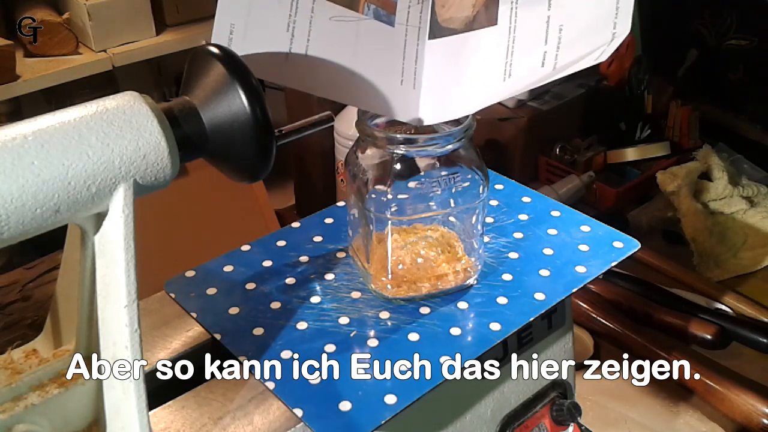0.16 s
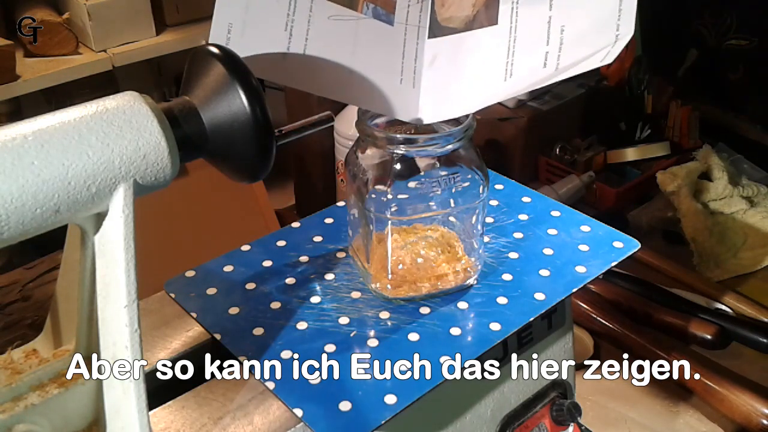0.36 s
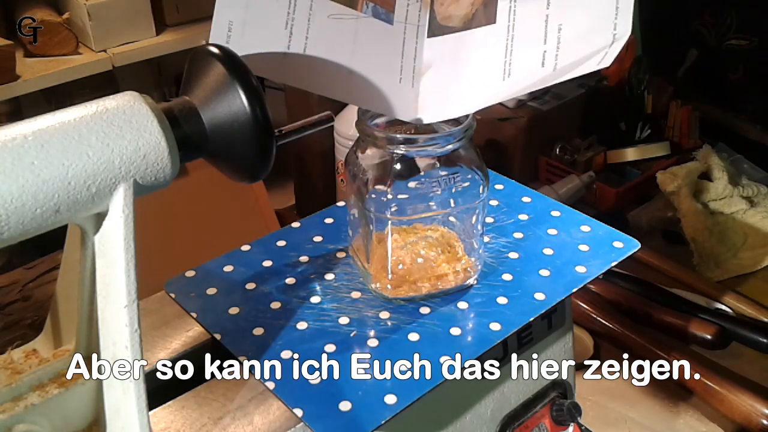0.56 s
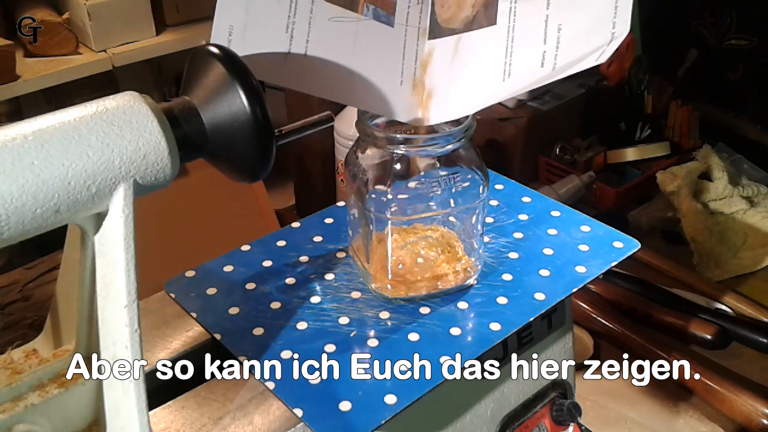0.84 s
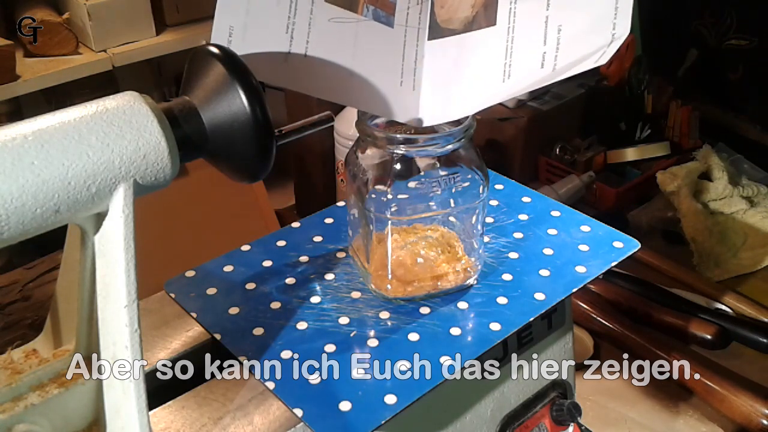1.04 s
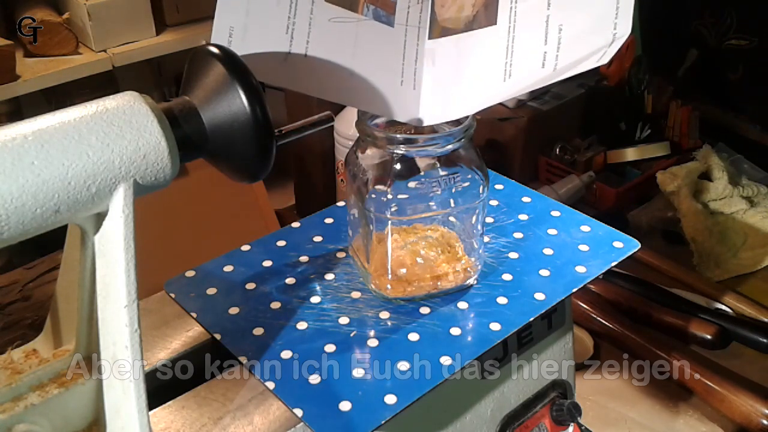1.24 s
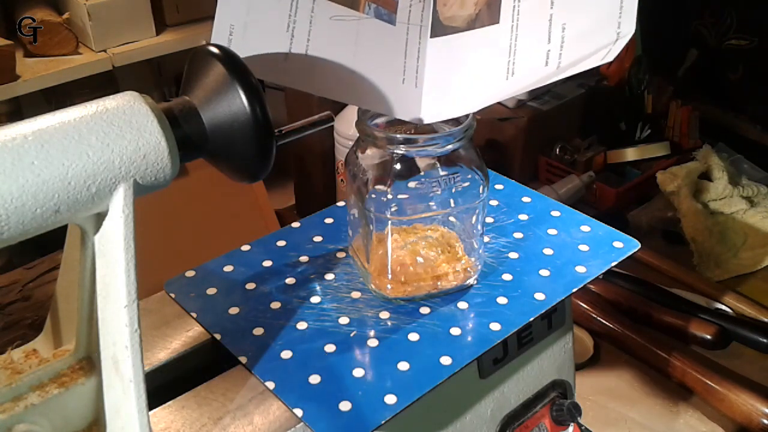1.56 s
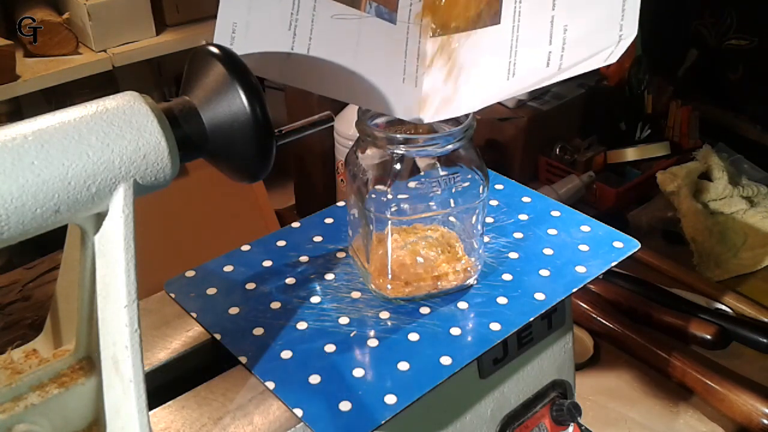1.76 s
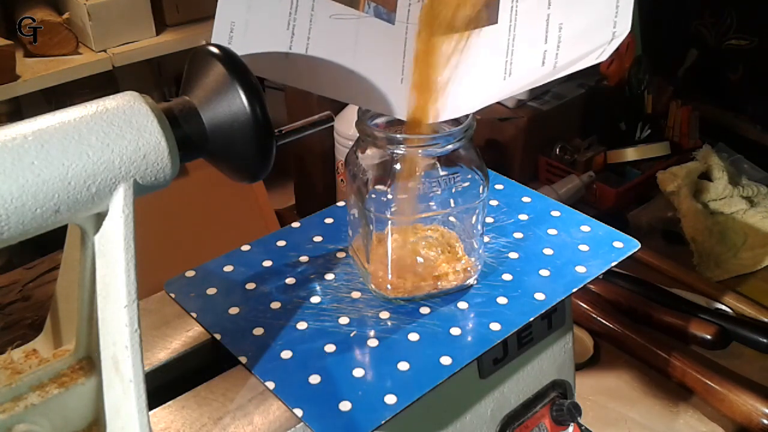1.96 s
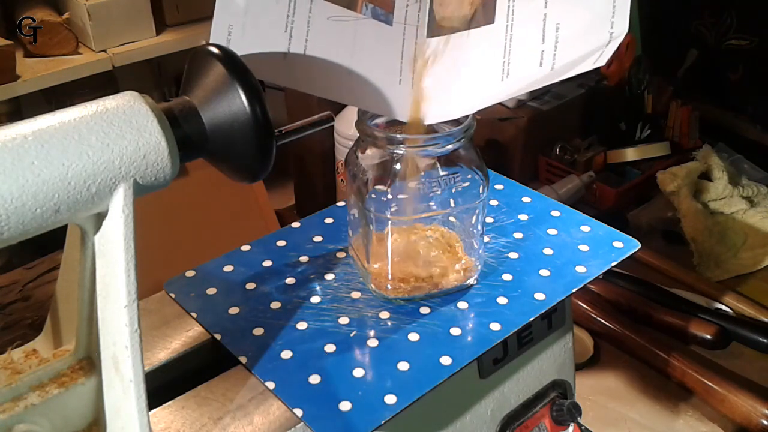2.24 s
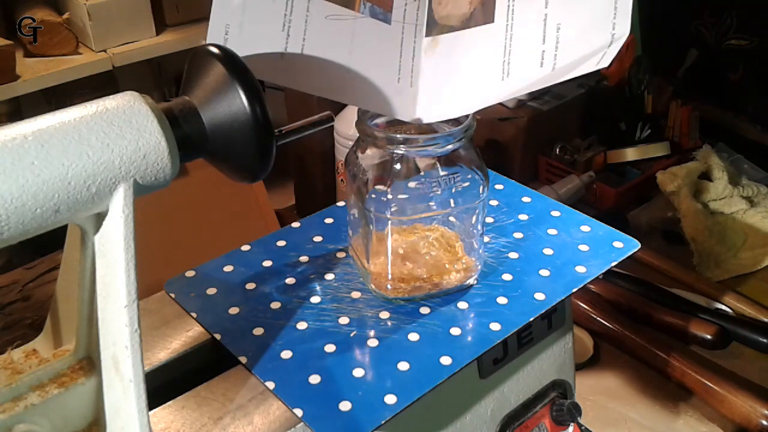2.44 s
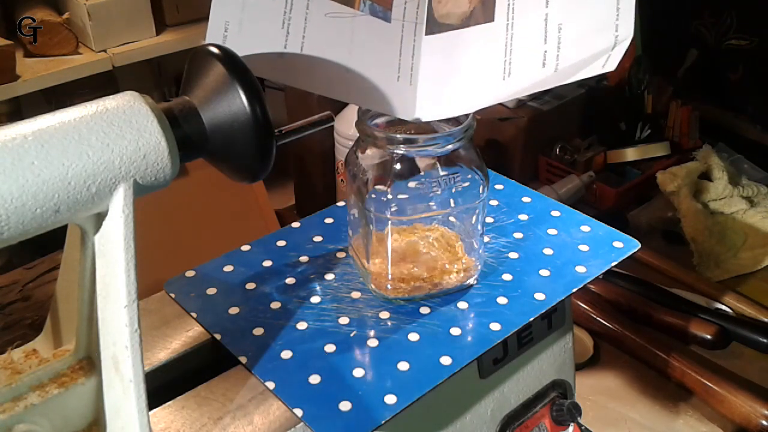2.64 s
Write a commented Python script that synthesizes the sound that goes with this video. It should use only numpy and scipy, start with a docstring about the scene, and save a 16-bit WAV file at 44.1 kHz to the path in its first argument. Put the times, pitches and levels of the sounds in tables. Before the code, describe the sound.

Crisp dry flakes tick and rattle into a glass jar, swelling twice into a grainy hiss

```python
"""In a quiet workshop, dry brittle flakes slide off a folded sheet of paper and drop into a glass jar.
Single flakes tick and bounce: each is a few clicks that ring briefly, with a short rattle of noise.
The stream swells twice into a dense hiss, made of thousands of random clicks and smooth sliding noise.
Resonances of the air in the jar colour it, and a few flakes ring the glass wall.
A short room tail, a slowly growing background hiss and a low rumble lie around it."""
import sys
import numpy as np
from scipy import signal
from scipy.fft import rfft, irfft
from scipy.io import wavfile

SR = 44100
rng = np.random.default_rng(int(sys.argv[2]) if len(sys.argv) > 2 else 0)


def master(y):
    """Save y as 16-bit WAV."""
    cut = np.clip(np.atleast_2d(y).T, -1, 1)
    pcm = np.round(cut * 32767)  # scale
    wavfile.write(sys.argv[1], SR, pcm.astype(np.int16))


N = 123479  # length in samples


def from_db(db):
    """Turn decibels into a gain."""
    return 10 ** (np.asarray(db) / 20)


def rms_one(x):
    """Scale a signal so that its rms is 1."""
    return x / np.sqrt(np.mean(x ** 2) + 1e-20)


def in_time(rows):
    """Join (time, value) points by straight lines, with one value for every sample."""
    return np.interp(np.arange(N) / SR, *np.transpose(rows))


def coloured(x, spectrum):
    """Filter with the shape of a spectrum, without ringing ahead; white noise keeps its power."""
    size = 4096
    hz, db = np.transpose(spectrum)
    grid_hz = np.maximum(np.arange(size // 2 + 1) * SR / size, 1)
    log_gain = np.interp(np.log(grid_hz), np.log(hz), db) * np.log(10) / 20
    # folding the cepstrum to positive times gives the minimum-phase pulse
    cepstrum = irfft(log_gain)
    cepstrum[1:size // 2] *= 2
    cepstrum[size // 2 + 1:] = 0
    pulse = irfft(np.exp(rfft(cepstrum)))
    return signal.fftconvolve(x, pulse / np.sqrt(np.sum(pulse ** 2)))[:N]


def drift(rate_hz):
    """Slow random wandering with rms 1: noise smoothed above the given rate."""
    r = np.exp(-2 * np.pi * rate_hz / SR)
    noise = rng.standard_normal(N + SR)
    settled = signal.lfilter([1], [1, -2 * r, r * r], noise)[SR:]
    return rms_one(settled)


def ring(clicks, hz, t60_s):
    """A unit click starts a sine of height 1 that fades by 60 dB in t60_s."""
    r = from_db(-60 / (t60_s * SR))
    w = 2 * np.pi * hz / SR
    return signal.lfilter([0, np.sin(w)], [1, -2 * r * np.cos(w), r * r], clicks + 1e-18)


def flake_sound(clicks, hz):
    """A flake cracks and rings for a few cycles at its own pitch, the ring scaled to the click's energy."""
    cycles, crack_share = 3.5, .5  # cycles until the ring is 60 dB down
    t60_s = cycles / hz
    one_ring = ring(np.arange(2000) == 0, hz, t60_s)
    rung = ring(clicks, hz, t60_s) / np.sqrt(np.sum(one_ring ** 2))
    return crack_share * clicks + np.sqrt(1 - crack_share ** 2) * rung


def dull(x):
    """Rubbing contacts are softer than hits, so their treble is weaker."""
    return signal.lfilter(*signal.butter(1, 2700, fs=SR), x)


def stream():
    """Flakes land at random, denser and stronger with the flow; returns their sound and the wall strikes."""
    # strength of the stream before jar and colour: start_s, level_db
    flow = [(0, -72), (.3, -65.5), (.49, -53), (.55, -42.5), (.6, -51), (.63, -37.5), (.68, -37),
            (.75, -30.5), (.92, -30), (.97, -34), (1.0, -36), (1.08, -36), (1.135, -49), (1.15, -35.5),
            (1.2, -45.5), (1.278, -55), (1.284, -37.5), (1.44, -37), (1.53, -43.5), (1.548, -43),
            (1.575, -50.5), (1.615, -49.5), (1.632, -44), (1.674, -43), (1.688, -32.5), (1.735, -31.5),
            (1.8, -23), (2.1, -22.5), (2.2, -25.5), (2.38, -30.5), (2.47, -34), (2.56, -38), (2.62, -42.5),
            (2.65, -51), (2.69, -59), (2.78, -66), (2.8, -44)]
    full_flow_db = -22
    flow_db = in_time(flow)
    below_full_db = flow_db - full_flow_db

    flakes_per_s, density_follows = 8000, .7  # landings at full flow; share of the dB swing that thins them
    chance = flakes_per_s * from_db(density_follows * below_full_db) / SR  # per sample

    # clumps: the level wanders, less in a denser stream
    clump_db, clump_most_db, clump_evens, clump_rate_hz = .68, 3, .57, 38
    clump_swing_db = np.minimum(clump_db * from_db(-clump_evens * below_full_db), clump_most_db)
    level_db = flow_db + clump_swing_db * drift(clump_rate_hz)

    size_db = 1 * np.minimum(rng.exponential(1, N), 3)
    sizes = rms_one(from_db(size_db) * rng.choice([-1, 1], N))
    # dividing by the root of the chance keeps the power tied to the flow alone
    clicks = (rng.random(N) < chance) * sizes / np.sqrt(chance) * from_db(level_db)

    # every flake is dealt one of 16 pitches
    pitches_hz = np.geomspace(677, 9740, num=16)
    dealt = rng.integers(0, 16, N)
    bed = sum(flake_sound(clicks * (dealt == k), hz) for k, hz in enumerate(pitches_hz))

    # fine dust and sliding: a smooth hiss that follows the flow
    slide_db, slide_follows = -1, .84  # against full flow; share of the dB swing
    slide_gain = from_db(full_flow_db + slide_db + slide_follows * below_full_db)
    bed = bed + slide_gain * dull(rng.standard_normal(N))

    # a full stream sounds thinner in the bass
    bass_hz, bass_loss_db, bass_follows = 1050, 12, 1
    bass = signal.lfilter(*signal.butter(1, bass_hz, fs=SR), bed)
    loss_db = bass_loss_db * from_db(bass_follows * below_full_db)
    bed = bed - bass * (1 - from_db(-loss_db))

    wall_share = .01  # of the stream's flakes
    return bed, clicks * (rng.random(N) < wall_share)


def landings():
    """Each single flake touches, slaps, bounces twice and stirs a short rattle among its neighbours."""
    # flakes that stand out: start_s, level_db (before jar and colour), pitch_hz
    flakes = [(0.0756, -26.5, 1300), (0.1039, -38, 5000), (0.1187, -30, 4400), (0.1443, -35, 6150),
              (0.1913, -26, 1210), (0.1947, -47, 5740), (0.2068, -35.5, 6100), (0.242, -40, 6200),
              (0.3111, -22.5, 6100), (0.3643, -27.5, 6070), (0.3747, -20.5, 2950), (0.414, -16.5, 2700),
              (0.4985, -20.5, 6000), (0.5074, -10, 2770), (0.5305, -19, 2300), (0.476, -36, 2700),
              (0.5623, -15, 2180), (0.6081, -20.5, 6300), (0.6231, -6.5, 2380), (0.656, -7, 1120),
              (0.681, -8, 1590), (1.0659, -10, 1900), (1.0929, -11, 4030), (1.0972, -22, 3900),
              (1.1448, -7.5, 1590), (1.1872, -13.5, 2260), (1.2131, -18.5, 1110), (1.2518, -18.5, 1020),
              (1.3385, -10.5, 4960), (1.4441, -17.5, 6000), (1.4889, -17.5, 5760), (1.5297, -16, 1650),
              (1.5548, -19, 6000), (1.6209, -24, 6040), (1.6332, -23, 5130), (2.43, -17, 6500),
              (2.4436, -12, 3940), (2.502, -8.5, 1120), (2.5291, -11.5, 6560), (2.5432, -19, 4970),
              (2.5722, -10.5, 2530), (2.6, -9, 3520), (2.642, -21, 7950), (2.6806, -29.5, 6900),
              (2.7302, -35, 6000), (2.7472, -34, 5900), (2.7705, -24.5, 6600), (2.7904, -22, 5760)]
    touch_lead_s, touch_db = .001, -9  # an edge touches just before the flat side slaps down
    bounce_s, bounce_loss_db = .006, 8
    rattle_db, stir_db, rattle_t60_s = -21, -19, .06  # ringing and rubbing parts of the rattle
    crisp_from_db, crispness = -30, .4  # hard hits stir relatively less

    size = 4000  # samples for each landing
    fade = from_db(-60 * np.arange(size) / SR / rattle_t60_s)
    out = np.zeros(N + SR)
    for start_s, level_db, pitch_hz in flakes:
        clicks = np.zeros(size)
        clicks[0] = from_db(touch_db)
        luck = rng.uniform(.7, 1.3, 3)  # uneven bounce times
        slap_s = touch_lead_s + np.cumsum(luck * [0, 1, 1]) * bounce_s
        clicks[(slap_s * SR).astype(int)] += from_db(-bounce_loss_db * np.arange(3))

        stir_gain = from_db(-crispness * (level_db - crisp_from_db))
        rattle = rng.standard_normal(size) * stir_gain * fade
        hit = flake_sound(clicks + from_db(rattle_db) * rattle, pitch_hz)
        rubbing = from_db(stir_db) * dull(rattle)
        i = int(start_s * SR)
        out[i:i + size] += from_db(level_db) * (hit + rubbing)
    return out[:N]


def flake_colour(x):
    """Landings are weak in the deep bass and the top treble, and strongest around 6 kHz."""
    # colour of a landing: pitch_hz, level_db (relative, per Hz)
    spectrum = [(90, -62), (170, -11.5), (253, -10.5), (419, -14), (725, -13.5), (1200, -9.5), (2500, -5.5),
                (3300, -5), (5970, 3), (8500, -3.5), (11500, -10.5), (13000, -22), (15400, -49)]
    return coloured(x, spectrum)


def jar(x):
    """The air in the jar changes the level at its resonances, which wander in strength and pitch."""
    # air resonances: pitch_hz, width_hz, boost_db (before the wandering)
    resonances = [(285, 14, 6.5), (495.4, 29.3, 12.5), (880, 53, 5), (1110, 52, 5), (1515, 32, 6.5),
                  (2300, 78, 6), (2624, 25, 6), (5310, 240, -1)]
    flicker_db, flicker_rate_hz = 3.5, 13  # the hollow tones come and go
    wander = .015  # share by which they drift in pitch
    step = 512  # samples between changes of pitch
    for hz, width_hz, boost_db in resonances:
        r = np.exp(-np.pi * width_hz / SR)
        moving_hz = hz * (1 + wander * drift(flicker_rate_hz))
        rung, state = np.zeros(N), np.zeros(2)
        zeros = (1 - r * r) / 2 * np.array([1, 0, -1])
        for i in range(0, N, step):
            poles = [1, -2 * r * np.cos(2 * np.pi * moving_hz[i] / SR), r * r]
            rung[i:i + step], state = signal.lfilter(zeros, poles, x[i:i + step], zi=state)
        flicker = from_db(flicker_db * drift(flicker_rate_hz))
        x = x + (from_db(boost_db) - 1) * flicker * rung
    return x


def glass(strikes):
    """Strikes on the wall ring every mode of the glass, each with a strength of its own."""
    # modes of the glass wall: pitch_hz, level_db (relative), t60_s
    modes = [(2374, -12, .14), (3824, -2.5, .15), (4267, -13, .15), (5677, 0, .16), (8000, -8, .08),
             (10470, -17, .08)]
    # single flakes that strike the wall: start_s, level_db (before the modes)
    wall_hits = [(.998, -25.5), (1.113, -43), (1.287, -39.5), (2.588, -35)]
    strikes = from_db(-24) * strikes  # the stream's own strikes are turned down
    for start_s, level_db in wall_hits:
        strikes[int(start_s * SR)] += from_db(level_db)
    out = np.zeros(N)
    for hz, level_db, t60_s in modes:
        strength_db = level_db + rng.normal(0, 1.5, N)
        out += ring(strikes * from_db(strength_db), hz, t60_s)
    return out


def workshop(x):
    """The room adds a short fading tail of scattered reflections, after a brief gap."""
    tail_db, t60_s, delay_s = -14, .13, .004
    t = np.arange(SR // 2) / SR
    tail = rng.standard_normal(len(t)) * from_db(-60 * t / t60_s) * (t > delay_s)
    tail = tail / np.sqrt(np.sum(tail ** 2))
    return x + from_db(tail_db) * signal.fftconvolve(x, tail)[:N]


def workshop_air():
    """Background hiss: coloured noise that slowly grows."""
    # colour of the hiss: pitch_hz, level_db (relative, per Hz)
    spectrum = [(15, -22), (25, -7), (64, -20), (104, -3.5), (1570, -36), (8080, -23), (10300, -19),
                (13500, -25), (15400, -28)]
    start_db, rise_db_per_s = -70, 3
    level_db = start_db + rise_db_per_s * np.arange(N) / SR
    return from_db(level_db) * coloured(rng.standard_normal(N), spectrum)


def low_rumble():
    """A band of deep noise with a typed level curve, almost silent from 1.95 s and back by 2.23 s."""
    # level of the rumble: start_s, level_db
    levels = [(0, -66.5), (.45, -66), (.55, -58.5), (1.7, -61.5), (1.8, -54.5), (1.92, -57), (1.95, -100),
              (2.2, -79), (2.23, -57.5), (2.8, -62)]
    band = signal.butter(2, [64.6, 155], "band", fs=SR, output="sos")  # Hz
    noise = rms_one(signal.sosfilt(band, rng.standard_normal(N)))
    return from_db(in_time(levels)) * noise


def scene():
    """Flakes in the jar and on the glass, heard in the room above the background."""
    bed, strikes = stream()
    in_jar = jar(flake_colour(bed + landings()))
    flakes = in_jar + glass(strikes)
    return (workshop(flakes) + workshop_air() + low_rumble())[None]


def record(dry):
    """Peaks are rounded off softly, then the top treble is cut."""
    top, cutoff_hz = .6, 15600
    rounded = top * np.tanh(dry / top)
    treble_cut = signal.cheby2(20, 70, cutoff_hz, fs=SR, output="sos")  # 70 dB down from the cutoff on
    return signal.sosfilt(treble_cut, rounded)


dry = scene()
out = record(dry)
master(out)
```